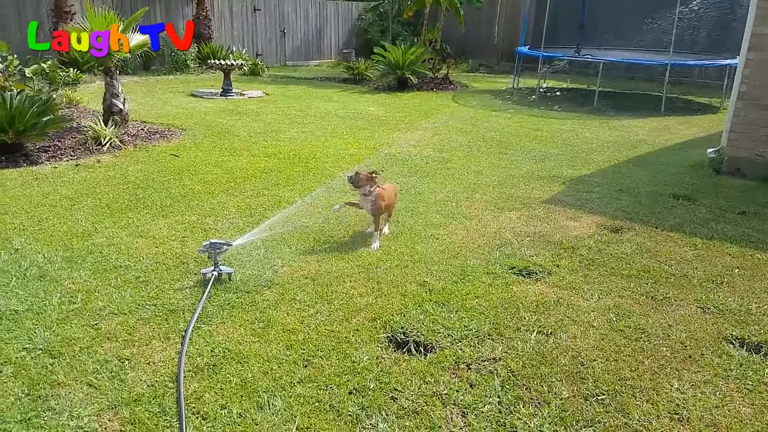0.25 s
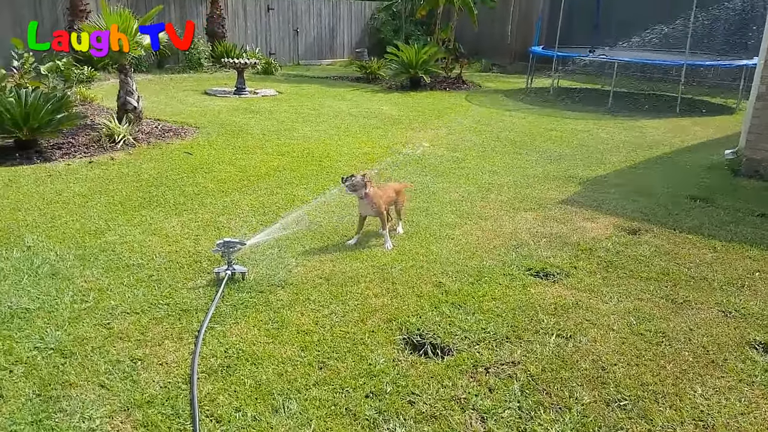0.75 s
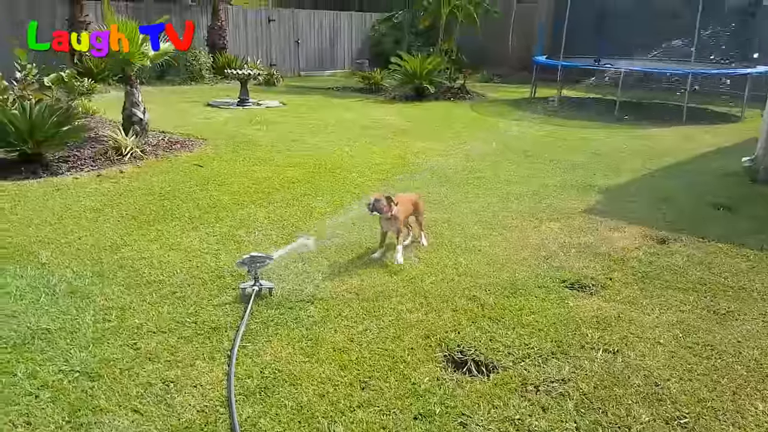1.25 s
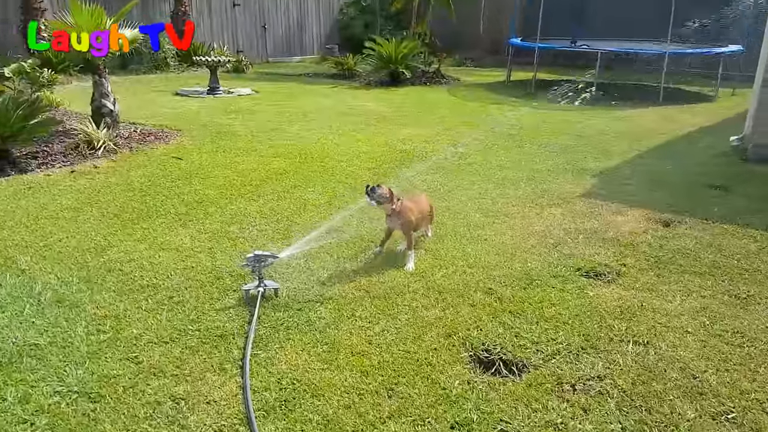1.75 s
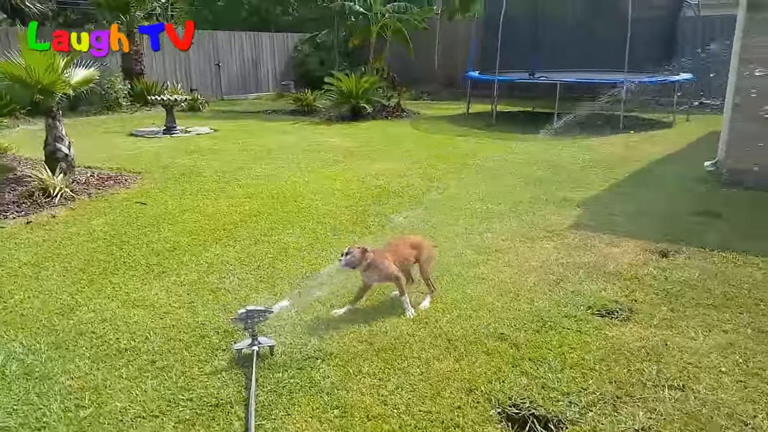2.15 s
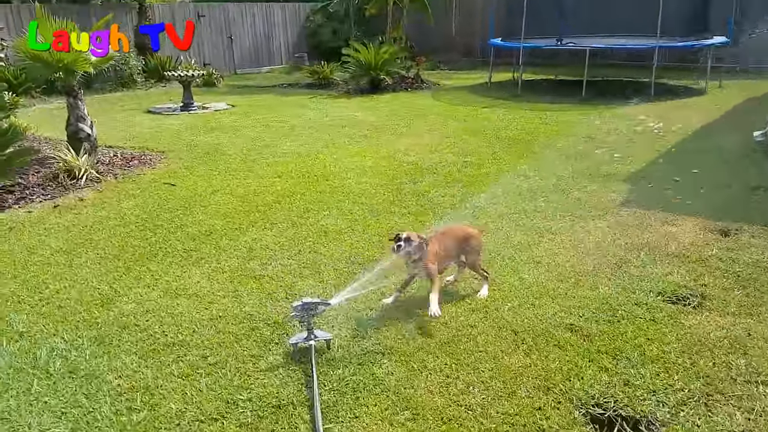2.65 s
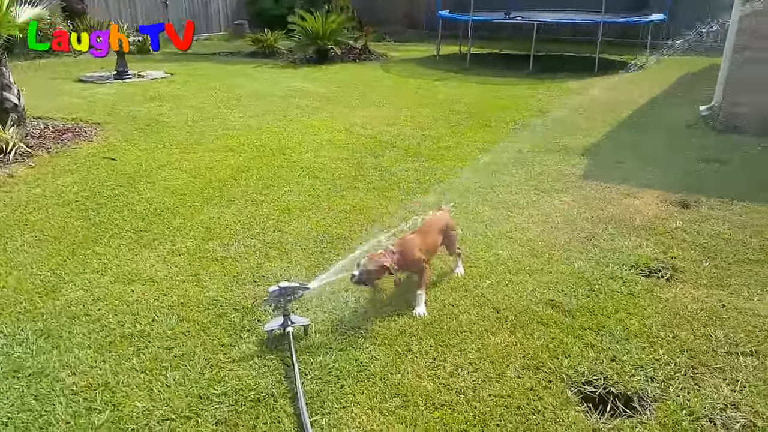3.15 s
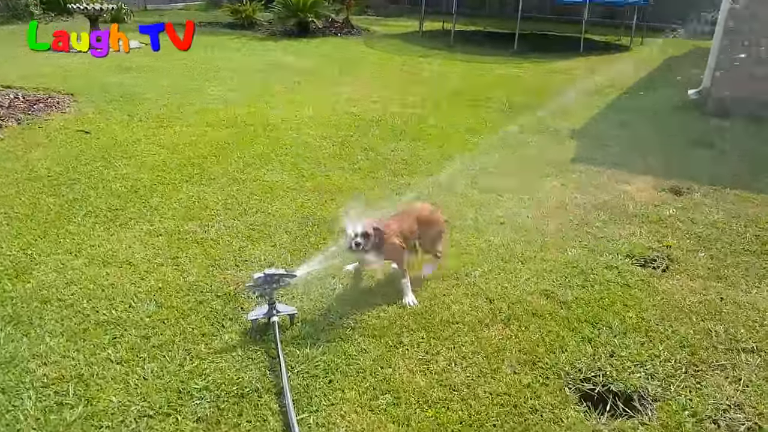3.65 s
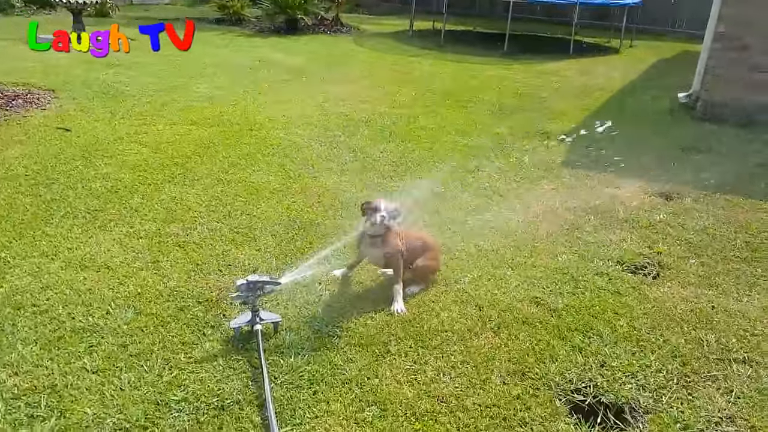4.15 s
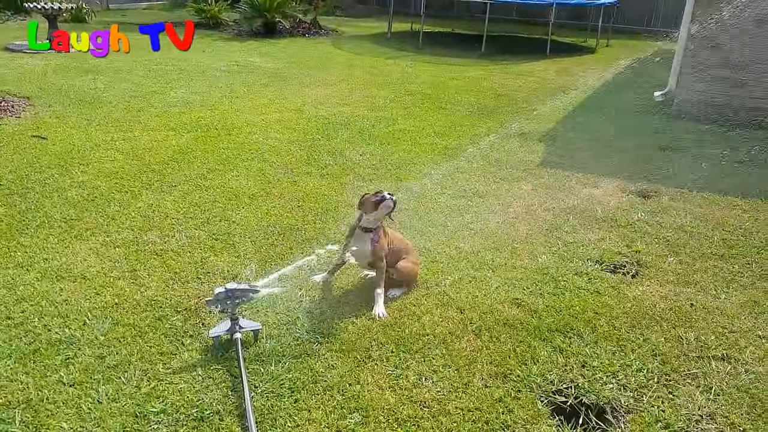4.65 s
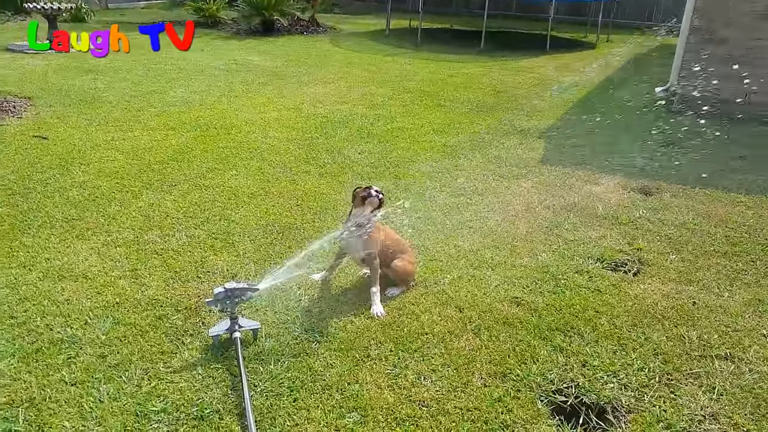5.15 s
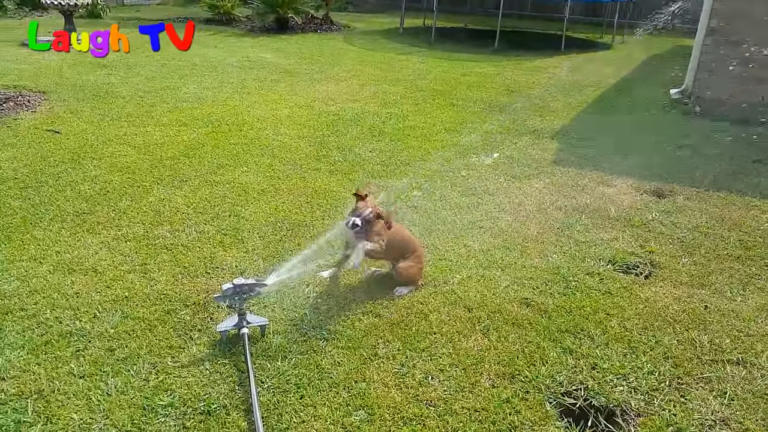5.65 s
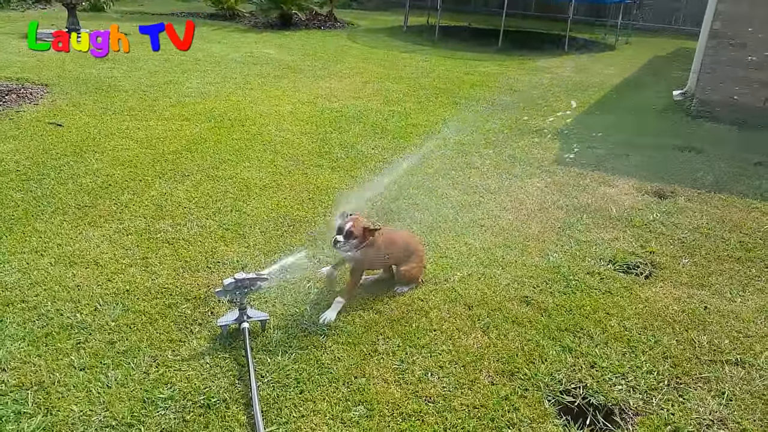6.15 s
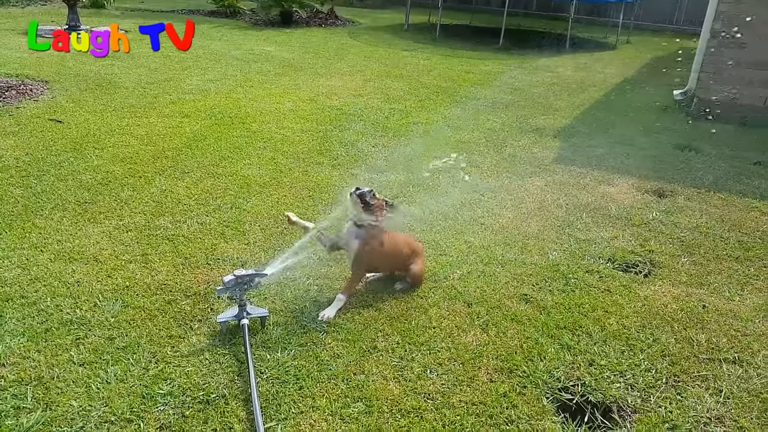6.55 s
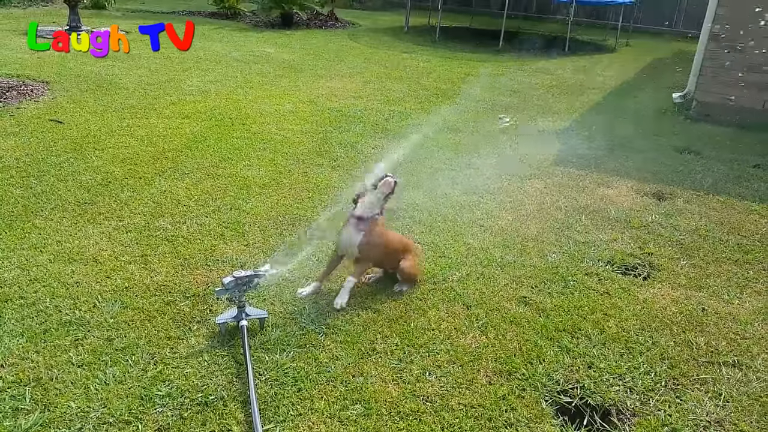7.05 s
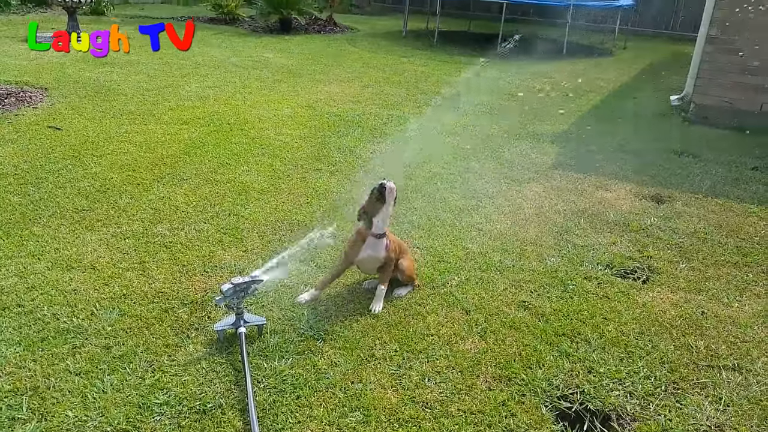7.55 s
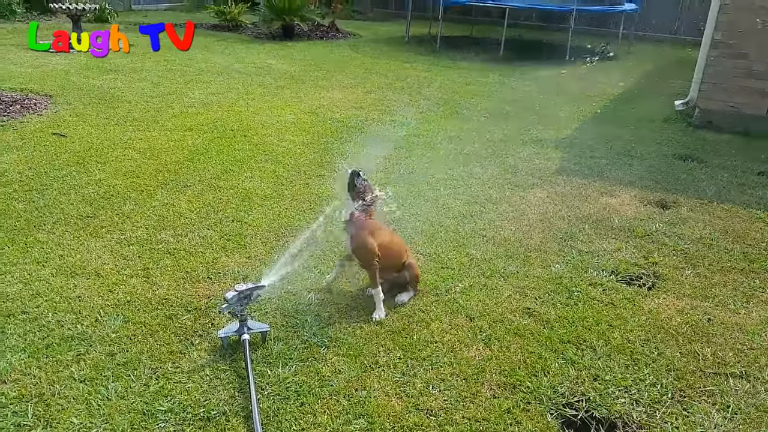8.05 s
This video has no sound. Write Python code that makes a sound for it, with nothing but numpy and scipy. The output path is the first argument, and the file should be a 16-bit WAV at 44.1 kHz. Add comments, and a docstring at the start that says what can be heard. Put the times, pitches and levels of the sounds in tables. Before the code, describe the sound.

On a backyard lawn, a handheld stereo phone hears an impact sprinkler. From 0.2 s, short, bright, ragged spurts come every 0.3 s, each with a small damped metallic knock and a faint watery swell after it. Fine hiss and drop patter on grass surround them; a low neighbourhood rumble and faint hum are strongest at the start and soon sink. A drop pops dully on the right microphone at 2.24 s, and a tiny fizzy ping follows at 2.7. The hiss grows closer and brighter to about 3.8 s, when spray begins hitting the dog's coat louder and denser. Hollow gurgles sound at 3.8 and 4.5 s. From 5 s the spurts double to roughly six or seven a second, quick chops without knocks, through 8.3 s. More short gurgles, some deeper, come between 6.6 and 7.3 s. Weak distant engine drones waver underneath.

```python
"""A hissing impact sprinkler chops its jet into spurts, slowly at first, then twice as fast on the return sweep.
A hand-held phone comes near it on a backyard lawn, while a dog plays in the jet and snaps at it.
Shaped noise and random drops make the jet, the spurts and the patter on grass and coat; rising tones make gurgles.
Low-pitched noise and wavering tones make the far background; a drop pops on the right microphone port."""
import sys
import numpy as np
from scipy import signal
from scipy.fft import rfft, irfft
from scipy.io import wavfile
from scipy.ndimage import map_coordinates

SR = 44100
rng = np.random.default_rng(int(sys.argv[2]) if len(sys.argv) > 2 else 0)


def store_wav(level_fs):
    """Save 16-bit WAV to argv[1]."""
    pcm = np.round(np.clip(np.atleast_2d(level_fs), -1, 1) * 32767)
    wavfile.write(sys.argv[1], SR, pcm.T.astype(np.int16))


N = 365588
T = np.arange(N) / SR  # time of each sample, s
F = np.maximum(np.arange(N // 2 + 1) * SR / N, 1)  # frequencies of the spectrum, Hz

# slow cuts of the arm through the jet on the forward sweep: start_s, length_s, relative level_db
FORWARD_BEATS = [(0.194, 0.031, -25), (0.502, 0.04, -26), (0.81, 0.031, -25), (1.117, 0.034, -24.3),
                 (1.425, 0.028, -24), (1.733, 0.026, -23), (2.04, 0.027, -23.5), (2.348, 0.031, -24.5),
                 (2.657, 0.025, -25.5), (2.959, 0.027, -25), (3.272, 0.025, -21), (3.567, 0.038, -23),
                 (3.881, 0.024, -19.5), (4.187, 0.025, -20.5), (4.496, 0.026, -21), (4.807, 0.028, -20.5)]
# cuts about twice as fast on the return sweep: time_s, relative level_db
RETURN_BEATS = [(4.979, -25), (5.127, -24.5), (5.282, -26), (5.43, -24), (5.58, -26), (5.736, -26),
                (5.883, -28), (6.04, -29.5), (6.189, -26), (6.341, -26.5), (6.495, -25.5), (6.649, -25),
                (6.799, -25.5), (6.953, -26.5), (7.105, -26.5), (7.248, -34), (7.412, -28.5),
                (7.561, -30.5), (7.722, -27.5), (7.875, -27.5), (8.029, -31), (8.181, -27)]
# the phone walks up to the sprinkler: time_s, way round to its side (0-1), mean ground reflection lag_ms
VIEW = [(0, 0.06, 1.92), (1, 0, 2.1), (2, 0.35, 2.3), (3, 0.77, 2.34), (4.5, 0.61, 2.29),
        (5.2, 0.95, 2.327), (8.29, 0.73, 2.35)]


def spurts(forward_db=-6.5, return_db=-4.5):
    """On every beat the arm's spoon swings into the jet and shatters it into uneven spits."""
    # sound of the broken water: pitch_hz, level_db
    spurt_colour = [(400, -26), (1200, -34), (1700, -11.5), (2400, -13.5), (3400, -9), (4200, 1),
                    (5000, 2.5), (6200, 3.5), (7000, -3.5), (7800, -5.5), (9500, -5), (12500, -9.5),
                    (15500, -11.5)]
    # a later, weaker swell after each forward beat: delay_s, rise_s, fall_s, level_db
    sheet_shape = [(0.068, 0.08, 0.023, -12)]
    # the spoon grazes the jet, then snaps through it: delay_s, rise_s, fall_s, level_db
    return_shape = [(-.006, 0.012, 0.0058, -2.5), (0.001, 0.0034, 0.0094, -0.5)]
    sheet = strokes([(start, db) for start, _, db in FORWARD_BEATS], sheet_shape)
    forward_power = undb(forward_db) ** 2 * (bites() + sheet)
    return_power = undb(return_db) ** 2 * strokes(RETURN_BEATS, return_shape)
    swell = np.sqrt(forward_power + return_power) * slaps()
    water = from_head(spurt_colour, swell, drop_rate=5800, drop_share=0.06, spread=0.2)
    return pocket(water)


def bites(edge_db=1.2, attack_s=.007, release_s=0.011):
    """Forward beats as power: the spoon bites into the jet, is deepest halfway through, and swings out."""
    power = np.zeros(N)
    for start, length, db in FORWARD_BEATS:
        near = slice(max(int((start - .1) * SR), 0), int((start + .2) * SR))
        t = T[near] - start
        depth_db = edge_db * (2 * np.sin(np.pi * np.clip(t / length, 0, 1)) - 1)
        # negative only outside the beat, where the power dies away
        outside = np.minimum(np.minimum(t / attack_s, (length - t) / release_s), 0)
        power[near] += undb(db + depth_db) ** 2 * np.exp(2 * outside)
    return power


def strokes(beats, shape, scatter=0.08):
    """A series of beats as power: each part of a stroke swells and falls, a little different every time."""
    power = np.zeros(N)
    for start, db in beats:
        near = slice(max(int((start - .2) * SR), 0), int((start + .2) * SR))
        for delay, rise, fall, part_db in shape:
            t = T[near] - start - delay
            stretch = np.exp(scatter * rng.standard_normal())
            width = stretch * np.where(t < 0, rise, fall)
            # a longer stroke is weaker, so its energy stays the same
            power[near] += undb(db + part_db) ** 2 / stretch * np.exp(-(t / width) ** 2)
    return power


def slaps(slap_hz=310, uneven=.3, ring_share=0.26, steady=0.86, size_db=0.64):
    """The broken jet slaps the spoon a few hundred times a second, unevenly; unit level."""
    phase = np.cumsum(slap_hz * np.exp(uneven * walk(rate=200))) / SR
    beating = steady + np.exp(-(phase % 1) / ring_share)
    beating = beating * undb(size_db * walk(rate=300))
    return beating / np.sqrt(np.mean(beating ** 2))


def pocket(water, hollow_hz=4950, width_hz=800, forward_gain=0.25, return_gain=-0.23, vary=0.072):
    """The spoon's hollow rings when it bites deep on the forward sweep, and is muted when it grazes the jet."""
    turn_s = [FORWARD_BEATS[-1][0], RETURN_BEATS[0][0]]
    depth = np.interp(T, turn_s, [forward_gain, return_gain])
    return water + (depth + vary * walk(rate=9)) * resonate(water, hollow_hz, width_hz)


def knocks(db=-27, lead_s=0.0052, attack_s=0.0029, decay_s=0.0052, drum_db=-5, drum_s=0.044):
    """The arm hits the body, cushioned by water, then the jet drums on the spoon; both ring the head."""
    # ringing modes of the struck body: pitch_hz, width_hz, relative level_db
    knock_modes = [(1330, 150, -17), (1755, 100, 3.5), (1900, 220, -9), (2510, 340, 3)]
    push, t = np.zeros(N), T[:SR // 8]
    hit_and_drum = np.exp(-t / decay_s) + undb(drum_db) * np.exp(-t / drum_s)
    blow = (1 - np.exp(-t / attack_s)) * hit_and_drum
    for beat_s, _, beat_db in FORWARD_BEATS:
        start = int((beat_s - lead_s) * SR)
        push[start:start + len(t)] += undb(beat_db) * blow
    push *= rng.standard_normal(N)
    ringing = np.zeros(N)
    for k, (hz, width, mode_db) in enumerate(knock_modes):
        # neighbouring modes move in opposite senses; narrow ones are lifted to equal power
        gain = (-1) ** k * undb(mode_db) * np.sqrt(SR / (np.pi * width))
        ringing += gain * resonate(push, hz, width)
    return undb(db) * ringing


def nozzle(db, flutter_db=0.88):
    """The free jet hisses and rings the sprinkler head, except where the spoon shields it."""
    # sound of the free jet: pitch_hz, level_db
    nozzle_colour = [(300, -11.5), (700, -5.5), (1300, -3), (2000, -3.5), (3000, 2), (4000, -6), (5000, 4),
                     (6000, 4.5), (7200, -4.5), (10000, -17), (13000, -8.5), (15500, -13)]
    # brief shielding after each return beat: delay_s, rise_s, fall_s, strength_db
    shield_shape = [(0.024, 0.029, 0.006, -8)]
    shielded = np.clip(strokes([(start, 0) for start, _ in RETURN_BEATS], shield_shape), 0, 1)
    swell = undb(db + flutter_db * walk(rate=70)) * (1 - shielded)
    return undb(-0.5) * from_head(nozzle_colour, swell, drop_rate=1500, drop_share=0.21, spread=0.38)


def from_head(rows, swell, drop_rate, drop_share, spread, behind=0.94, beside=1.023, slant=1.11):
    """Spray made at the sprinkler head: darker from behind, brighter and more ringing from the side."""
    # ringing of the head, with hollows between its modes: pitch_hz, width_hz, gain_db
    head_modes = [(1310, 170, 4), (1510, 140, -6), (1650, 70, 10), (1800, 130, -6), (6200, 70, 4),
                  (6320, 400, 1), (12576, 100, 4)]
    side = np.clip(curves(VIEW)[0], 0, 1)
    dark_gain = colour(rows, behind)
    bright_gain = colour(rows, beside) * bumps(head_modes)
    dark = spray(dark_gain, swell * np.sqrt(1 - side), drop_rate, drop_share, spread, slant)
    bright = spray(bright_gain, swell * np.sqrt(side), drop_rate, drop_share, spread)
    return dark + bright


def landing(db, surge_db=1.5, dog_enters_s=2.1, dog_entry_s=1.7, dog_share=0.72):
    """Spray patters on the far grass, or closer on the coat of the dog, which comes to catch most of it."""
    # patter on the grass: pitch_hz, level_db
    lawn_colour = [(250, 4), (500, 2), (800, -0.5), (1100, 2), (1550, 7.5), (2100, 2.5), (2900, 5),
                   (4000, 10), (5200, 6), (7000, 4.5), (10000, 6), (13000, 5.5), (15500, 1.5)]
    # patter on the dog's coat: pitch_hz, level_db
    coat_colour = [(250, -6), (450, -8), (650, -3), (900, -4.5), (1300, -8), (1900, -5.5), (2500, 2),
                   (3200, 4), (5000, -0.5), (8000, 2.5), (10500, 2.3), (13000, 2.5), (15500, -4)]
    share = np.clip(dog_share, 0, 1) * np.clip((T - dog_enters_s) / dog_entry_s, 0, 1)
    swell = undb(db + surge_db * walk(rate=25))
    lawn = spray(colour(lawn_colour), swell * np.sqrt(1 - share),
                 drop_rate=1500, drop_share=0.14, spread=0.5, slant=1.15)
    coat = spray(colour(coat_colour), swell * np.sqrt(share), drop_rate=900, drop_share=0.23, spread=0.54)
    return undb(6.0) * lawn + undb(5.5) * coat


def spray(gain, swell, drop_rate, drop_share, spread, slant=1):
    """Fine mist plus single drops of uneven size, coloured and heard at two ports; unit level times swell."""
    # the water at the two ports, opposed near 3 kHz: pitch_hz, left_lead_radians, likeness (0-1)
    port_lags = [(100, 0.5, 0.86), (654, 0.6, 0.51), (1000, 0, 0.5), (1540, 1.29, 0.85), (2350, 1.2, 0.18),
                 (2700, 2.0, .2), (2950, 3, .99), (3350, 3.25, .99), (3700, 2.4, 0.05), (4750, 2.0, 0.72),
                 (6040, 2, 0.72), (7600, 2.8, 0.25), (8500, 3.1, .35), (10700, 5, 0.15), (13000, 7.2, 0.42),
                 (15500, 7.7, .3)]
    drops = (rng.random((3, N)) < drop_rate / SR) * rng.standard_normal((3, N))
    drops *= np.exp(spread * np.clip(rng.standard_normal((3, N)), -2, 2))
    share = np.clip(drop_share, 0, 1)
    mist = rng.standard_normal((3, N))
    water = np.sqrt(1 - share) * mist + np.sqrt(share) * drops / drops.std()
    direct, *scattered = rfft((water * swell).astype(np.float32))
    hz, lead, likeness = np.transpose(port_lags)
    hz = hz / slant  # a more slanting arrival lengthens the lag between the ports
    alike = np.clip(np.interp(F, hz, likeness), 0, 1)
    # the direct sound reaches the right port later; the scattered part differs at each
    ports = np.array([direct, direct * np.exp(-1j * np.interp(F, hz, lead))])
    both = np.sqrt(alike) * ports + np.sqrt(1 - alike) * np.array(scattered)
    coloured = both * gain / np.sqrt(np.mean(gain ** 2))
    return irfft(coloured.astype(np.complex64), N)


def flutter(water, from_hz=2500, depth_db=1.7, band_hz=220, rate=24):
    """Narrow bands of the water sound flutter, each on its own; less so below from_hz."""
    hz, s, bands = signal.stft(water, SR, nperseg=512)
    # stretch random points to band_hz wide and rate a second
    place = np.array(np.meshgrid(hz / band_hz, s * rate, indexing="ij"))
    chance = map_coordinates(rng.standard_normal(bands.shape[1:]), place, order=3)
    gain = undb(depth_db * np.minimum(hz / from_hz, 1)[:, None] * chance)
    gain /= np.sqrt(np.mean(gain ** 2, axis=1, keepdims=True))
    return signal.istft(bands * gain, SR)[1][:, :N]


def ground(water, bounce=0.22, absorb_hz=3200, sway_ms=0.073):
    """Adds the reflection off the wet lawn, dulled by the grass; its comb drifts as the phone moves."""
    lag_ms = curves(VIEW)[1] + sway_ms * walk(rate=3.45)
    dull = irfft(rfft(water) / np.sqrt(1 + (F / absorb_hz) ** 2), N)
    place = np.arange(N) - lag_ms * SR / 1000
    return water + bounce * np.array([map_coordinates(port, [place], order=3) for port in dull])


def sway(port, sway_ms=.008):
    """The hand turns the phone slightly, so the lag between the ports and their hollow near 3 kHz wander."""
    place = (T + sway_ms / 1000 * walk(rate=6)) * SR
    return map_coordinates(port, [place], order=5)


def sloshes(splash_db=-1.5, bubble_db=-5.5, bubble_rate=220, cycles=5, glide=0.034):
    """Short hollow gurgles when the dog snaps at the jet: a run of rising bubbles inside a soft splash."""
    # the jet drums into the dog's mouth and on its chest:
    # middle_s, length_s, hollow pitch_hz, width_hz, level_db before the splash and bubble settings
    gurgles = [(3.83, .1, 860, 307, -53), (4.467, 0.18, 1330, 300, -46.5), (6.589, 0.062, 790, 297, -52),
               (6.738, 0.056, 820, 180, -43), (7.063, 0.1, 380, 220, -52), (7.248, 0.07, 390, 260, -47)]
    out, t = np.zeros(N), T[:SR // 10]
    for middle, length, hz, width, db in gurgles:
        count = max(int(length * bubble_rate), 1)
        bubbles = np.zeros(N)
        for k, (late, pitch, size) in enumerate(rng.random((count, 3))):
            f = hz + width * (pitch - .5) / 2
            age = t * f / cycles  # each bubble dies away over a few cycles
            start = int((middle + length * ((k + late) / count - .55)) * SR)
            rising = np.sin(2 * np.pi * f * t * (1 + glide * age / 2))
            bubbles[start:start + len(t)] += (.5 + size) * np.exp(-age) * rising
        fade = np.exp(-np.square(np.square((T - middle) / (.55 * length))))
        splash = resonate(rng.standard_normal(N), hz, width) * fade
        for part, part_db in (bubbles, bubble_db), (splash, splash_db):
            out += undb(db + part_db) * part * np.sqrt(length * SR / np.sum(part ** 2))
    return out


def port_drop(relax_hz=108, damping=0.56, rise_s=.00005):
    """A drop seals the right port: steps of pressure that leak away with an undershoot."""
    # pressure steps as the drop lands: time_s, relative height
    drop_steps = [(2.2388, 0.09), (2.2405, 0.93)]
    out, w = np.zeros(N), 2 * np.pi * relax_hz
    angle = np.arcsin(np.clip(damping, .1, .95))
    for start, height in drop_steps:
        t = np.clip(T - start, 0, .1)
        swing = np.cos(w * np.cos(angle) * t + angle) / np.cos(angle)
        leak = np.exp(-w * np.sin(angle) * t) * swing
        out += 1.05 * height * (1 - np.exp(-t / rise_s)) * leak
    return out * np.array([[0], [1]])  # right side only


def pings(attack_s=.005):
    """A small, faint, bright, fizzy ring of narrow noise that fades within a few hundredths of a second."""
    # time_s, pitch_hz, width_hz, decay_s, level_db
    rings = [(2.712, 8250, 260, 0.011, -31)]
    out = np.zeros(N)
    for start, hz, width, decay, db in rings:
        ring = irfft(rfft(rng.standard_normal(N)) / (1 + (2 * (F - hz) / width) ** 2), N)
        t = np.maximum(T - start + attack_s, 0)
        out += undb(db) * ring / ring.std() * (1 - np.exp(-t / attack_s)) * np.exp(-t / decay)
    return out


def distance(side_db=-12, hum_swell=1.7, rumble_db=-51.5, swell_start_db=6, settle_s=0.47):
    """Neighbourhood rumble with engine drones and a faint hum, nearly the same at both ports."""
    # sound of the rumble: pitch_hz, level_db
    distant_colour = [(20, -13), (45, -6), (80, -1.5), (130, 1), (165, -1.5), (205, -5.5), (300, -13),
                      (500, -14.5), (900, -27), (2000, -56)]
    mid, side = irfft(rfft(rng.standard_normal((2, N))) * colour(distant_colour), N)
    rumble = (mid + undb(side_db) * side * np.array([[1], [-1]])) / mid.std()
    swell_db = swell_start_db * np.exp(-T / settle_s)  # loudest at the start, then dies away
    # a far machine, whose hum fades from the start along with the rumble
    hum = tone(244, -65.5 + hum_swell * swell_db, waver_db=3.5, drift_hz=1.404)
    return rumble * undb(rumble_db + swell_db + 1.05 * walk(rate=20)) + drones() + hum


def drones(fade_s=0.24):
    """Each far engine fades in, wavers about its pitch and fades out."""
    # start_s, length_s, pitch_hz, level_db
    engines = [(2.25, 0.59, 119.3, -54), (3.35, 5.7, 133.1, -60), (5.503, 1.56, 132.1, -57.5)]
    out = np.zeros(N)
    for start, length, hz, db in engines:
        fade = np.clip(np.minimum(T - start, start + length - T) / fade_s + .5, 0, 1)
        out += fade * tone(hz, db, waver_db=2.5, drift_hz=2.43)
    return out


def tone(hz, db, waver_db, drift_hz):
    """A far machine's tone, unsteady in level and pitch after its way through the air."""
    phase = 2 * np.pi * np.cumsum(hz + drift_hz * walk(rate=12)) / SR
    return np.sqrt(2) * undb(db + waver_db * walk(rate=5)) * np.sin(phase)


def undb(db):
    """Decibels to gain."""
    return 10 ** (np.asarray(db) / 20)


def curves(rows):
    """One value per sample for each column of a timed table."""
    s, *columns = np.transpose(rows)
    return [np.interp(T, s, column) for column in columns]


def colour(rows, stretch=1):
    """Gain per frequency through (Hz, dB) points, shifted in pitch by stretch, with the lowest bass reduced."""
    hz, db = np.transpose(rows)
    gain = undb(np.interp(np.log(F / stretch), np.log(hz), db))
    return gain * np.minimum(F / hz[0], 1) ** 2


def bumps(rows):
    """Gain per frequency of a few bell-shaped peaks and hollows."""
    return undb(sum(db * .5 ** ((2 * (F - hz) / width) ** 2) for hz, width, db in rows))


def resonate(x, hz, width):
    """One resonance, gain 1 at its centre."""
    return signal.lfilter(*signal.iirpeak(hz, hz / width, fs=SR), x)


def walk(rate):
    """Random curve of unit spread: straight lines between random points, rate of them a second."""
    steps = rng.standard_normal(N // 8)
    y = np.interp(T * rate, np.arange(len(steps)), steps)
    return y / y.std()


def scene():
    """The water, reflected by the ground and coloured by the right port, over the other sounds."""
    # strength of the jet's hiss before the nozzle's own trim: time_s, level_db
    jet = [(0, -52), (0.8, -46), (2.0, -43.5), (3.0, -42), (3.8, -39), (4.8, -40), (6.6, -40), (7.3, -41),
           (8.29, -42.5)]
    # landing spray, thinning as the jet turns away and jumping as the dog gets into it:
    # time_s, level_db before the lawn and coat gains
    patter = [(0.0, -45), (2.1, -44.5), (2.55, -50.5), (3.16, -50), (3.3, -46.5), (3.68, -45.5),
              (3.86, -41), (4.35, -41.5), (4.62, -43), (6.56, -41.5), (7.3, -42.3), (8.29, -42)]
    # resonances and notches of the right port: pitch_hz, width_hz, gain_db
    right_port = [(1300, 740, 5.5), (1990, 360, 5.5), (2436, 340, 4), (3430, 300, -3.5), (4930, 710, 2.5),
                  (6455, 2240, 9.5), (8420, 1240, -3.5), (9560, 900, 3.5), (11200, 890, -3.5),
                  (13040, 1600, 5.5)]
    jet_db, patter_db = curves(jet)[0], curves(patter)[0]
    water = flutter(spurts() + nozzle(jet_db) + landing(patter_db))
    left, right = ground(water + knocks())
    right = sway(irfft(rfft(right) * bumps(right_port), N))
    return np.array([left, right]) + sloshes() + pings() + distance() + port_drop()


def record(dry, threshold=0.28, ratio=1.3, recover_db_per_s=25, lag_s=0.0066, top_hz=15750):
    """The phone turns its gain down after an overload and lets it back up, then cuts the top steeply."""
    peak = np.abs(dry).max(axis=0)  # full scale is 1
    over_db = np.maximum(20 * np.log10(peak / threshold + 1e-9), 0) * (1 - 1 / max(ratio, 1))
    # hold the deepest cut so far while it recovers at a steady rate
    recovery_db = recover_db_per_s * T
    duck_db = np.maximum.accumulate(over_db + recovery_db) - recovery_db
    held = dry * undb(-np.interp(T - lag_s, T, duck_db))
    return signal.sosfilt(signal.ellip(12, .1, 80, top_hz, fs=SR, output="sos"), held)


dry = scene()
out = record(dry)
store_wav(out)
```